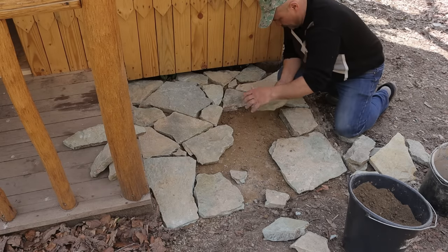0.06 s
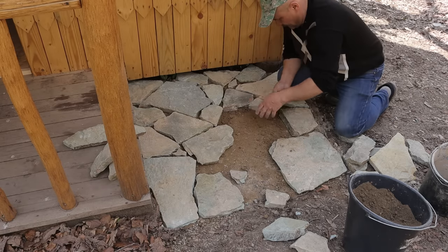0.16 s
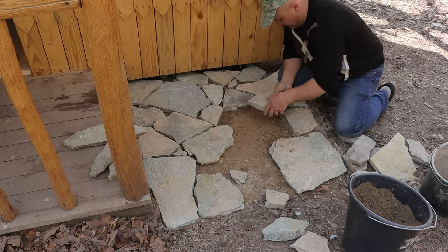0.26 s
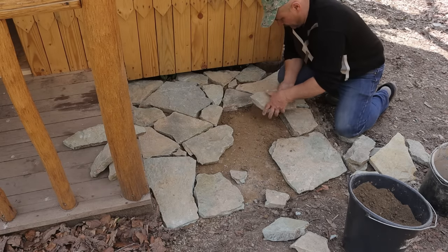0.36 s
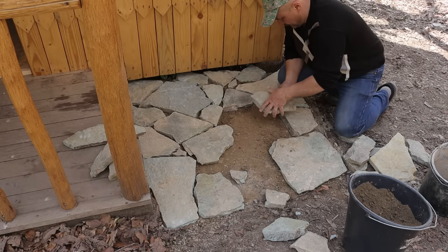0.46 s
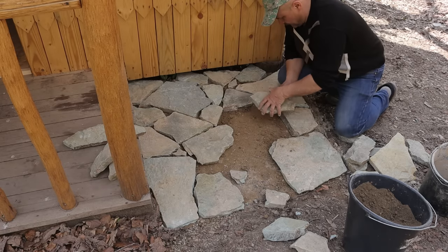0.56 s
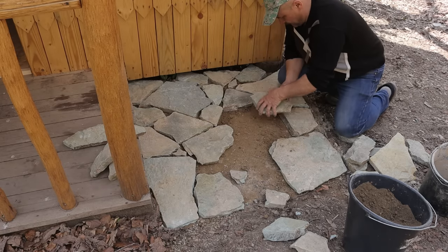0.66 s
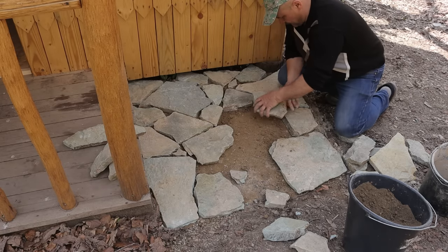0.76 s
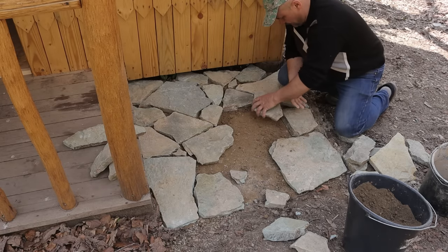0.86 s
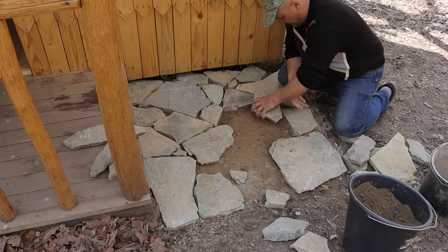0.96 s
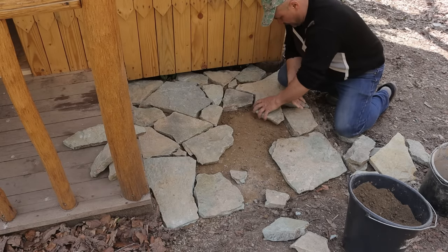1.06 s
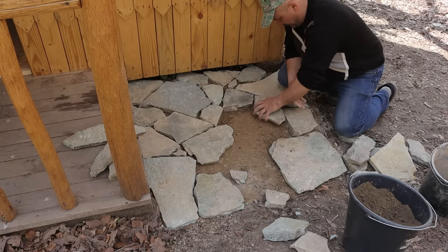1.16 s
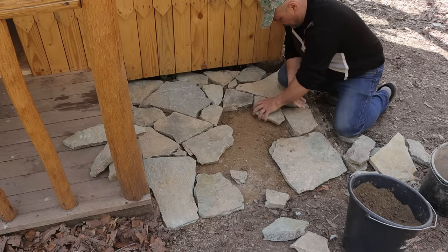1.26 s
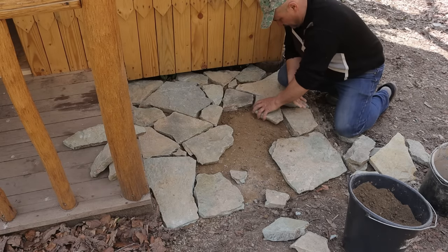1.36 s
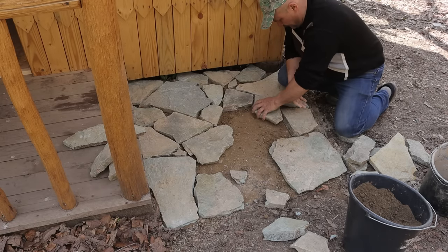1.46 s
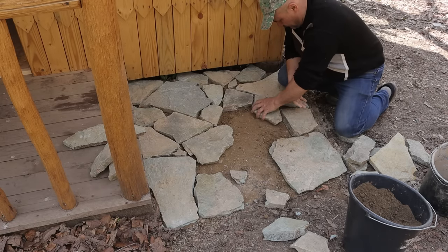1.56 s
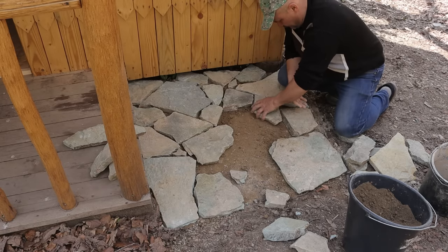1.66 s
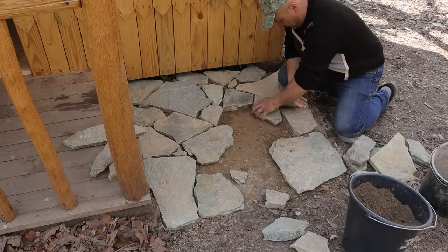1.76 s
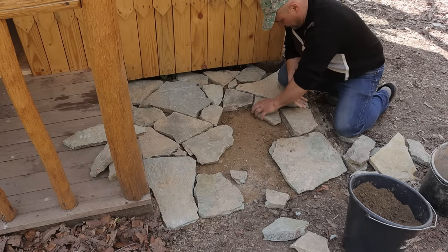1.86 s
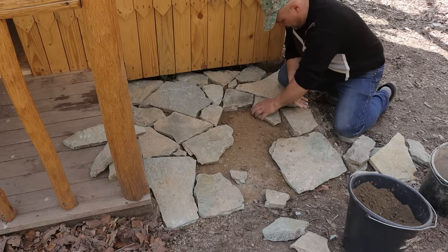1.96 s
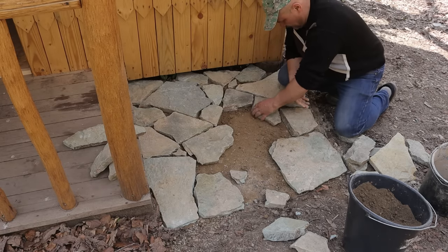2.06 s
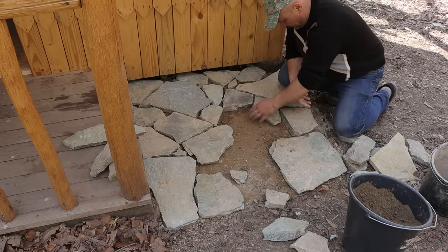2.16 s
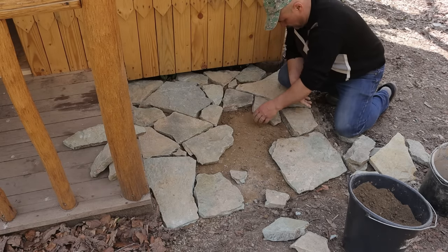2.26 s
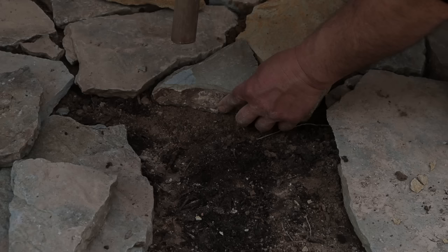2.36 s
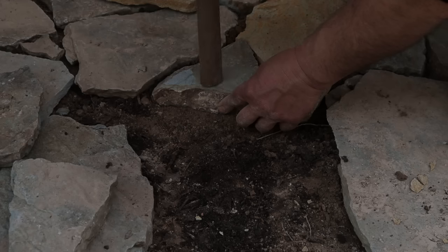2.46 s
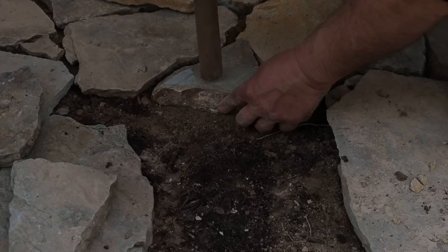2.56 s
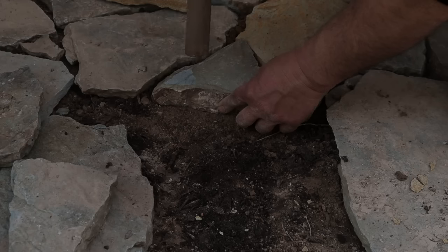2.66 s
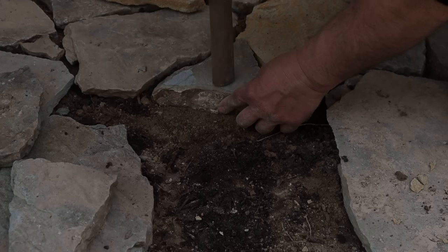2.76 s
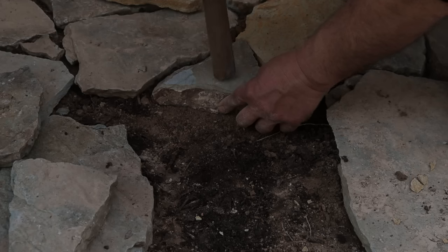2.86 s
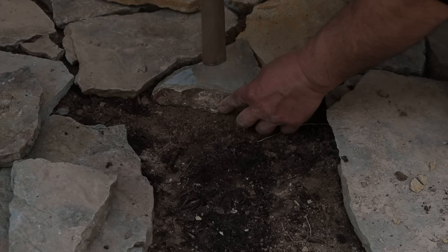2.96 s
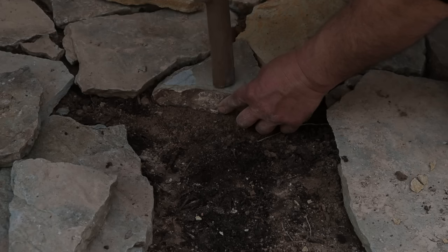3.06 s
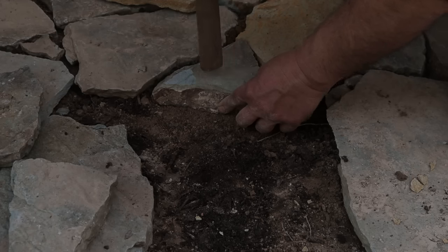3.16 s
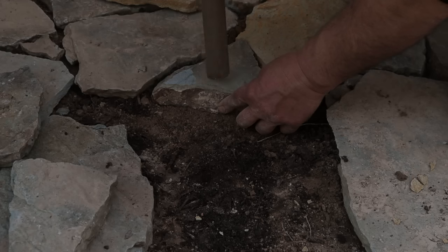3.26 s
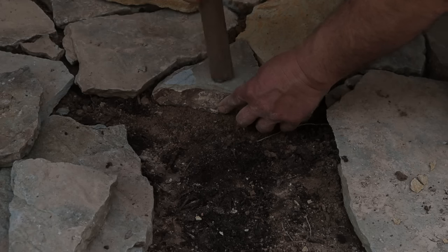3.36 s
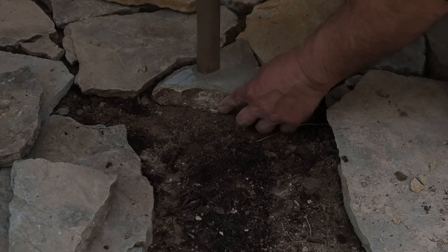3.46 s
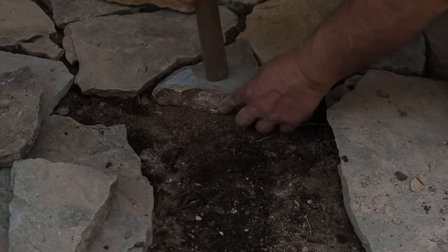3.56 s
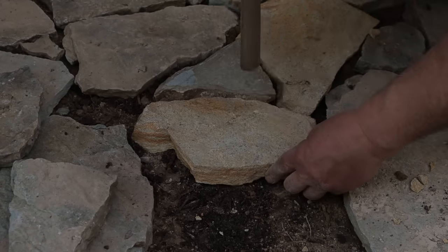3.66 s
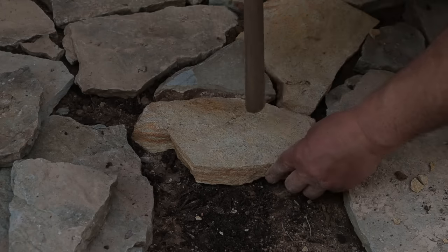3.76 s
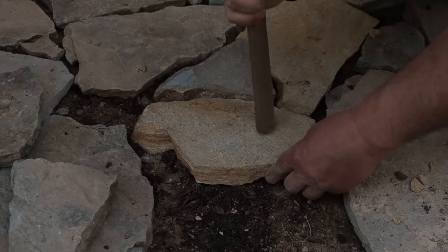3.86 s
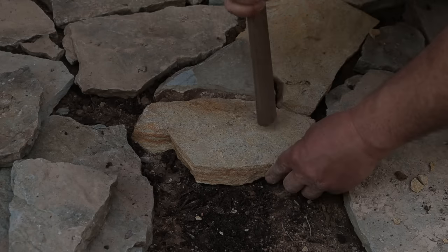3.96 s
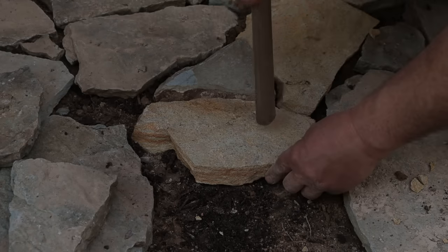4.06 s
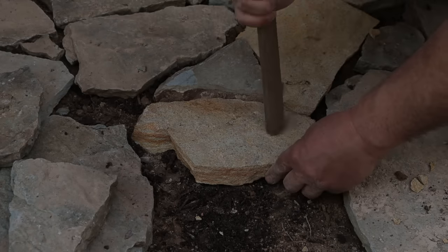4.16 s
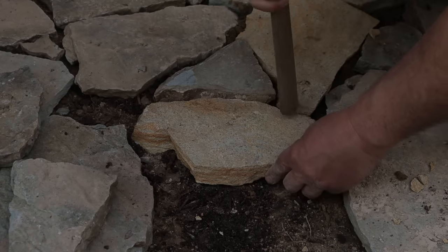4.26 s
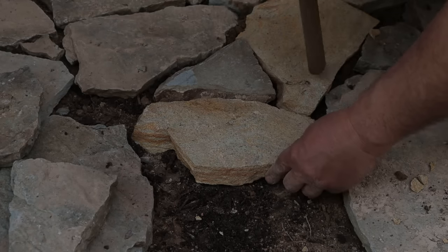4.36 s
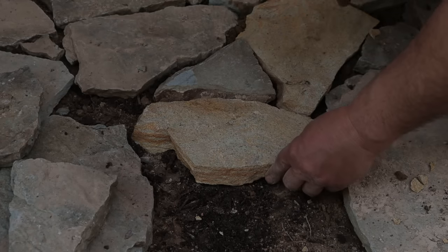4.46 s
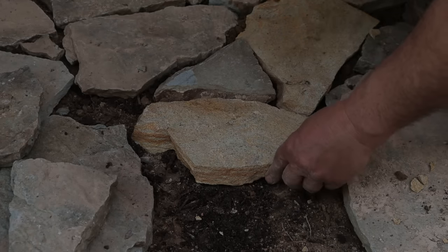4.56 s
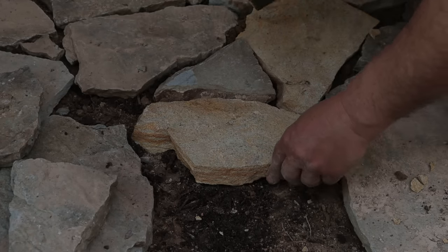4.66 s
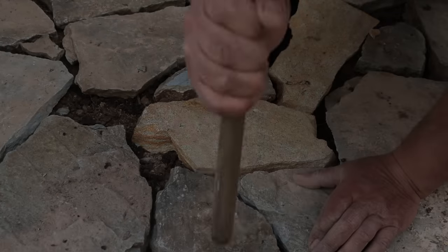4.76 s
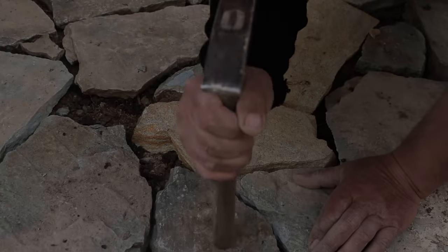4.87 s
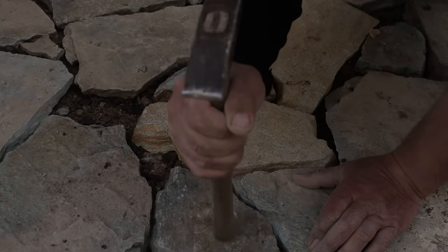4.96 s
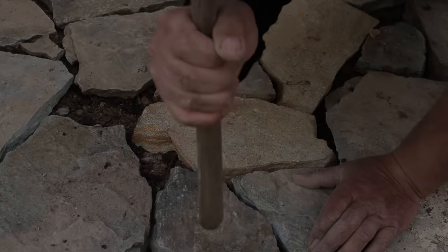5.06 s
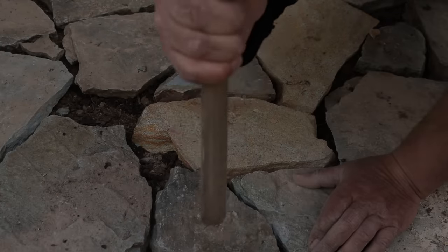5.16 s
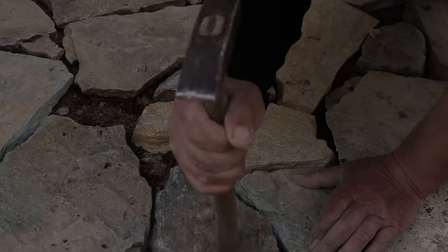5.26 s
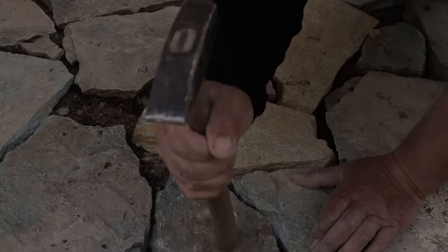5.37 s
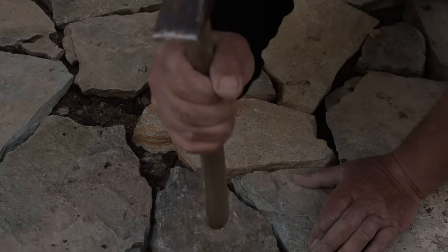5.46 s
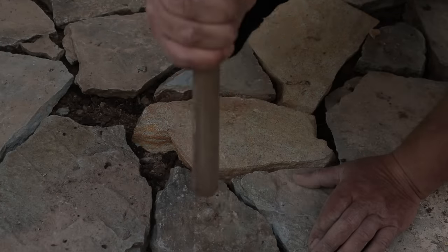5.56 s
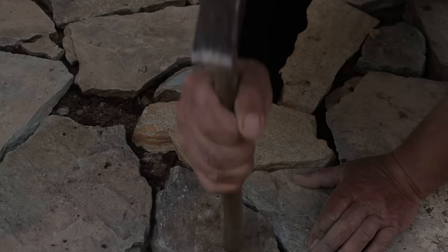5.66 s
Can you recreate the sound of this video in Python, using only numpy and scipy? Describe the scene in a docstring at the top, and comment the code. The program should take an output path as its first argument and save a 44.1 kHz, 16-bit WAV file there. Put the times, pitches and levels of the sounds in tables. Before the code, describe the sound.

Soft sliding and bumping of a loose stone outdoors, followed by loud, close, dead knocks of a hammer handle tamping flagstones.

```python
"""Laying flagstones in a yard

A quiet yard, one microphone. A loose stone is slid over soil, knocked against its neighbours and
dropped in place. Then, close by, the butt of a wooden hammer handle tamps three slabs: dead knocks,
a low boom at the microphone, a ping from the steel head. The knocks overload the microphone and duck
its gain. The yard echoes, small birds call far off, stretches of low rumble and rustle come and go."""
import sys
import numpy as np
from scipy import signal
from scipy.fft import rfft, irfft
from scipy.io import wavfile
from scipy.ndimage import uniform_filter1d, minimum_filter1d

SR = 44100
rng = np.random.default_rng(int(sys.argv[2]) if len(sys.argv) > 2 else 0)


def generate_wav(signal):
    """Clip the signal to [-1, 1] and save it as 16-bit WAV at the path in sys.argv[1]."""
    frames = np.transpose(np.atleast_2d(signal))
    scaled = np.clip(frames, -1, 1) * 32767
    pcm = np.round(scaled).astype(np.int16)
    wavfile.write(sys.argv[1], SR, pcm)


N = 251811
TIME = np.arange(N) / SR
AGE = np.arange(SR * 3 // 4) / SR  # seconds since a contact

# tamping blows: start_s, strength_db, slab_number, brightness_hz, crack_db, ping_db
BLOWS = [(2.5300, 16, 0, 10000, 7, 2.5), (2.8512, 15.5, 0, 5560, 2, 4.5),
         (3.128, 14.5, 0, 3790, -27.5, 4.5), (3.3761, 14, 0, 6500, 9, 6), (3.5916, 14, 0, 8100, -3.5, -8),
         (3.92, 8.5, 1, 3500, 3.5, -1), (4.2020, 9.5, 1, 3000, -0.5, -7), (4.8994, 14, 2, 10000, 12.5, 9.5),
         (5.3372, 14, 2, 8950, 10, -16)]
# modes of each slab under the handle, damped by its bed of soil: pitch_hz, width_hz, level_db
SMALL_SLAB_MODES = [(443, 17, -15.5), (549, 211, 1.5), (877.8, 172, 4.5), (1095, 220, 1.5), (1329.3, 23, 5),
                    (1408, 14, -14), (1752.7, 170, -1.5), (2519, 220, -1), (3110.4, 263, -0.5),
                    (4092, 89, -4.5), (4711, 423, -2.5), (5450, 240, -5), (7370, 800, -11.5)]
FLAT_SLAB_MODES = [(266, 510, -7.5), (700, 60, -1.5), (834, 251, 10.5), (934.31, 140, 10), (980, 12, -1.5),
                   (1146, 96, -11.5), (1446.1, 340, -13.5), (1920, 71, -20.5), (2730, 1100, -11.5),
                   (5014.9, 3000, -24)]
BROAD_SLAB_MODES = [(177.7, 40, -14), (243, 153, -11), (614, 178, -11), (771.8, 110.2, 10),
                    (1186, 160, -10), (1333.2, 174, 4), (1564, 265, -2), (2000, 66, -37.5),
                    (3265, 318, -1.5), (4680, 237, -7), (4830, 210, -32.5), (6120, 230, -20.5)]
# how each slab sounds from where it lies: cutoff_s, scatter_db, yard_db, echo_swell_s,
# echo_mode_width_ratio, lowest_radiated_hz, crack_t60_s, thud_db, late_swell_db
SLAB_PLACES = [(3.703, -14.5, -25, 0.0245, 2.82, 250, 0.0116, 4.5, -50.5),
               (4.72, -17.5, -31.5, 0.0067, 0.64, 250, 0.017, 0, -56),
               (5.71, -18, -26, 0.0137, 2.02, 700, 0.0083, 6.5, -42.5)]
# modes of the low thud and of the steel hammer head: pitch_hz, width_hz, level_db
LOW_THUD_MODES = [(45, 13, -4.5), (78.5, 7.54, 3), (110.4, 130, -7.5), (162, 43, -8.5)]
HEAD_MODES = [(8495, 30, 0)]

# knocks of the loose stone: start_s, strength_db, brightness_hz, grit_db, thud_db
STONE_KNOCKS = [(1.2113, -13.5, 859, -29.5, -44), (1.2470, -41, 2500, -4, -25.5),
                (1.3, -19.5, 1300, -15.5, -15.5), (1.3160, -36, 700, -8.5, 3.5),
                (1.5071, -13.5, 691, -24.5, -34.5), (1.5777, -8.5, 2500, -28.5, -39.5),
                (1.6308, -7, 1110, -28, -35.5), (1.9590, -30, 2500, 0, 12.5)]
# its dull body and its clear ring: pitch_hz, width_hz, level_db
STONE_BODY_MODES = [(198.5, 79, -16), (501, 27.7, 10.5), (664, 354, 10), (998, 58, -25), (1124, 247, 17),
                    (1500, 300, -13.5), (2100, 453, 9), (2500, 176, -4), (3700, 130, -30.5),
                    (5420, 134, -1)]
STONE_RING_MODES = [(2075, 45, -4.5), (2497, 14.76, 22), (2620, 22, -17.5), (3806, 14, 5.5),
                    (4390, 42, -6.5), (5320, 36.6, 6.5)]
# its scrapes along a neighbour and sweeps over soil: peak_s, swell_s (per 20 dB), level_db
STONE_SCRAPES = [(1.5, 0.04, -49.5), (1.922, 0.0285, -33.5)]
SOIL_SWEEPS = [(.015, -16.44, -52), (.48, 0.2538, -53.5), (.585, 0.13, -56), (.79, 0.34, -59),
               (1.95, 0.3763, -59), (2.033, 0.41, -56), (4.64, 0.01, -57.5)]
# spectra of grit rubbed on stone and of brushed soil: frequency_hz, density_db
GRIND_SPECTRUM = [(150, -2), (650, 1), (1100, 0), (1700, -10.5), (2100, 5.5), (2550, -0.5), (3000, -15),
                  (3700, -7.5), (4000, -25), (4350, -9.5), (4900, -25), (5600, -7), (6700, -31.5),
                  (7700, -12), (8600, -19.5), (15000, -27)]
BRUSH_SPECTRUM = [(500, -17), (2400, 4), (5000, -1.5), (8000, 1), (12500, 3), (16000, -14.5)]
# crumbs of grit landing: start_s, peak_db, pitch_hz
CRUMBS = [(3.721, -35, 3000), (3.725, -38, 5500), (4.838, -42.5, 2500), (5.462, -42, 10000)]

# distant bird calls: start_s, length_s, start_hz, final_hz, level_db
BIRD_CHIRPS = [(0.778, 0.109, 2660, 3908, -60), (3.75, 0.13, 2670, 2478, -61),
               (4.031, .015, 3240, 2783, -46.5), (4.294, .015, 3224, 2765, -51),
               (4.626, 0.042, 3400, 3517, -60.5), (4.72, .03, 6895, 5400, -60.5),
               (4.741, .065, 4810, 4393, -59.5), (5.632, 0.0162, 6500, 4740, -55),
               (5.642, 0.048, 4680, 4450, -59)]
# stretches of low rumble and background rustle: start_s, length_s, rumble_db, rustle_db
NOISE_STRETCHES = [(1.206, 0.57, -57, -64), (2.403, 1.5, -59.5, -57.5), (4.708, 1, -44, -57.5)]
# spectra of the outdoor hush, the low rumble and the rustle: frequency_hz, density_db
AIR_SPECTRUM = [(20, -7.5), (60, -10.5), (137, -15.5), (400, -17.5), (600, -19), (850, -20), (1400, -24.5),
                (2000, -25.5), (2500, -26.5), (4000, -29), (11000, -32.5), (16000, -35)]
RUMBLE_SPECTRUM = [(20, 0.5), (45, 4.5), (62, -11), (88, 0), (120, -12), (250, -39.5), (800, -58),
                   (3000, -78)]
RUSTLE_SPECTRUM = [(100, -10), (500, 0.5), (1300, 1), (3500, -10), (7000, -25), (16000, -22)]

# close reflections off stones, the worker's body and the fence: delay_s, level_db
CLOSE_REFLECTIONS = [(.0033, -17), (.0093, -33.5), (0.0125, -18)]
# scatter off paving and fence, and the echo of the whole yard: band_hz, t60_s, level_db
NEAR_SCATTER = [(100, 0.23, 5.5), (500, .07, 2), (1200, 0.098, 0), (5020, 0.096, -7.5),
                (10000, 0.025, -4.5), (15000, .05, 0.5)]
YARD_ECHO = [(80, 0.094, 8), (250, 0.21, 10.5), (700, 0.306, -3), (1010, 0.3416, -1.5), (1450, 0.2845, 0.5),
             (2260, 0.3034, -4), (3400, 0.3264, -6.5), (6500, 0.2142, -5), (14000, 0.047, -1.5)]


def tamping():
    """Close by, the handle hits a slab: a crack of grit, a low boom, a steel ping, a faint late swell."""
    out = np.zeros(N)
    slabs = (SMALL_SLAB_MODES, FLAT_SLAB_MODES, BROAD_SLAB_MODES)
    for number, (slab, place) in enumerate(zip(slabs, SLAB_PLACES)):
        cutoff_s, scatter_db, yard_db, swell_s, widen, lowest_hz, crack_t60_s, thud_db, late_db = place
        direct, radiated, boom = np.zeros((3, N))
        for start_s, strength_db, slab_number, bright_hz, crack_db, ping_db in BLOWS:
            if slab_number != number:
                continue
            knock = 2.418 * ring(slab, detune=.02)  # each grip shifts the modes a little
            crack = amp(crack_db - 14.5) * soften(grit_burst(crack_t60_s), hz=4740)
            contact = soften(knock + crack, bright_hz, order=2)
            ping = amp(ping_db - 44.5) * ring(HEAD_MODES)
            add(direct, start_s, amp(strength_db) * (contact + ping))
            # the sound sent all round rings with the slab's modes widened or narrowed by the place's ratio
            all_round = soften(ring(slab, widen=widen), bright_hz, order=2)
            add(radiated, start_s, amp(strength_db + 7.5) * all_round)
            thud = soften(ring(LOW_THUD_MODES), hz=545)
            add(boom, start_s, amp(strength_db + thud_db - 23.5) * thud)
        radiated = radiate(radiated, lowest_hz)
        late_tail = noise_tail(YARD_ECHO, delay_s=0.1122, swell_s=0.08)  # faint noise after each knock
        late_swell = amp(late_db) * signal.fftconvolve(radiated, late_tail)[:N]
        at_mic = outdoors(direct, radiated, scatter_db, yard_db, swell_s) + late_swell + boom
        for delay_s, level_db in CLOSE_REFLECTIONS:
            add(at_mic, delay_s, amp(level_db) * soften(direct, hz=3000))
        out += at_mic * np.clip((cutoff_s - TIME) / 0.0032, 0, 1)  # the sound breaks off, echo and all
    return out


def loose_stone():
    """A hand-held stone bumps its neighbours, grinds along them and drops on the soil."""
    ring_db, choke_db_per_s, grit_t60_s = -10, 500, 0.0487
    out = np.zeros(N)
    thud = soften(ring(LOW_THUD_MODES, widen=1.83), hz=197)
    rubbing = strokes(STONE_SCRAPES, hold_s=0.0129, fade_db_per_s=651)
    next_touches = [row[0] for row in STONE_KNOCKS[1:]] + [TIME[-1]]
    for (start_s, strength_db, bright_hz, grit_db, thud_db), next_s in zip(STONE_KNOCKS, next_touches):
        body = 2.287 * soften(ring(STONE_BODY_MODES, far_side=True), bright_hz, order=4)
        clear = soften(ring(STONE_RING_MODES, far_side=True), bright_hz, order=2)
        clear *= amp(ring_db - choke_db_per_s * np.maximum(start_s + AGE - next_s, 0))
        add(out, start_s, amp(strength_db) * (body + clear + amp(thud_db) * thud))
        add(rubbing, start_s, amp(strength_db + grit_db - 60 * AGE / grit_t60_s))  # a knock crushes grit
    out += rubbing * noise(GRIND_SPECTRUM, grain_db=3)
    return outdoors(out, out, scatter_db=-14, yard_db=-34.5)


def soil():
    """Soil hisses under the sliding stone; single crumbs tick on the paving."""
    sweeping = strokes(SOIL_SWEEPS, hold_s=0.01, fade_db_per_s=278)
    out = sweeping * noise(BRUSH_SPECTRUM, grain_db=2.5)
    for start_s, peak_db, pitch_hz in CRUMBS:
        tick = signal.fftconvolve(grit_burst(t60_s=0.0118), ring([(pitch_hz, pitch_hz / 5, 0)]))
        add(out, start_s, amp(peak_db) * tick / abs(tick).max())
    return out


def birds():
    """Thin wavering whistles far from the microphone, blurred by distance."""
    out = np.zeros(N)
    for start_s, length_s, start_hz, final_hz, level_db in BIRD_CHIRPS:
        samples = round(length_s * SR)
        waver = unit(uniform_filter1d(rng.standard_normal(samples), size=60))
        pitch_hz = np.geomspace(start_hz, final_hz, samples) * (1 + .02 * waver)
        whistle = np.sin(2 * np.pi * np.cumsum(pitch_hz) / SR)
        add(out, start_s, amp(level_db) * whistle * signal.windows.tukey(samples, 0.5))
    return outdoors(out, out, scatter_db=-5, yard_db=-12)


def background():
    """Over a steady outdoor hush, stretches of low rumble and rustle set in abruptly, hold and fade."""
    rise_s, fade_db_per_s = 0.0165, 33.5
    out = amp(-56) * noise(AIR_SPECTRUM)
    rumble, rustle = noise(RUMBLE_SPECTRUM), noise(RUSTLE_SPECTRUM)
    for start_s, length_s, rumble_db, rustle_db in NOISE_STRETCHES:
        rise = np.clip((TIME - start_s) / rise_s, 0, 1)
        fade = amp(-fade_db_per_s * np.maximum(TIME - start_s - length_s, 0))
        out += rise * fade * (amp(rumble_db) * rumble + amp(rustle_db) * rustle)
    return out


def outdoors(direct, radiated, scatter_db, yard_db, swell_s=.014):
    """Paving and fence scatter the direct sound at once; the yard returns what is radiated all round."""
    near = signal.fftconvolve(direct, noise_tail(NEAR_SCATTER, delay_s=0.001, swell_s=0.0033))
    far = signal.fftconvolve(radiated, noise_tail(YARD_ECHO, delay_s=0.01, swell_s=swell_s))
    return direct + (amp(scatter_db) * near + amp(yard_db) * far)[:N]


def noise_tail(bands, delay_s, swell_s):
    """A tail of sparse noise, energy 1, that sets in after a delay, each band dying at its own speed."""
    taps = rng.choice([-1., 1.], len(AGE)) * (rng.random(len(AGE)) < 0.1)
    hz, age_s, spectra = signal.stft(taps, SR, nperseg=128)
    band_hz, t60_s, level_db = np.transpose(bands)
    colour_db = curve_at(np.c_[band_hz, level_db], hz)[:, None]
    decay_db = 60 * age_s / curve_at(np.c_[band_hz, t60_s], hz)[:, None]
    tail = signal.istft(spectra * amp(colour_db - decay_db), SR)[1][:len(AGE)]
    tail *= np.clip((AGE - delay_s) / swell_s, 0, 1)
    return tail / np.linalg.norm(tail)


def ring(modes, detune=0, widen=1, far_side=False):
    """Struck modes, detuned at random by up to the given fraction; wider modes die sooner."""
    pitch_hz, width_hz, level_db = np.transpose(modes)[:, :, None]
    pitch_hz = pitch_hz * (1 + detune * (2 * rng.random(pitch_hz.shape) - 1))
    weight = amp(level_db) * width_hz / np.sum(amp(level_db) * width_hz)
    if far_side:  # away from the contact, neighbouring modes start in opposition: a softer attack
        weight = weight * np.cos(np.pi * np.arange(len(pitch_hz)))[:, None]
    decay = np.exp(-np.pi * widen * width_hz * AGE)
    return (weight * decay * np.cos(2 * np.pi * pitch_hz * AGE)).sum(0)


def grit_burst(t60_s):
    """Grit crushed in a contact: noise that dies at once."""
    return rng.standard_normal(len(AGE)) * amp(-60 * AGE / t60_s)


def strokes(rows, hold_s, fade_db_per_s):
    """Gain of a rubbing hand: each stroke gathers speed, holds for a moment and stops."""
    gain = np.zeros(N)
    for peak_s, swell_s, level_db in rows:
        swell_db = 20 * np.maximum(peak_s - TIME, 0) / swell_s
        fade_db = fade_db_per_s * np.maximum(TIME - peak_s - hold_s, 0)
        gain += amp(level_db - swell_db - fade_db)
    return gain


def noise(spectrum, grain_db=0):
    """Coloured noise of rms 1; grain_db makes it gritty, in clumps of a millisecond."""
    clumps = amp(grain_db * unit(uniform_filter1d(rng.standard_normal(N), size=44)))
    colour = amp(curve_at(spectrum, np.fft.rfftfreq(N, 1 / SR)))
    return unit(irfft(rfft(clumps * rng.standard_normal(N)) * colour, N))


def radiate(x, hz):
    """A small source sends little of its sound below hz into the distance."""
    return signal.sosfilt(signal.butter(2, hz, "highpass", fs=SR, output="sos"), x)


def soften(x, hz, order=1):
    """Low-pass: takes off the treble above hz, as a softer contact does."""
    return signal.sosfilt(signal.butter(order, hz, fs=SR, output="sos"), x)


def curve_at(points, hz):
    """Interpolates a curve on a log-frequency axis."""
    point_hz, value = np.transpose(points)
    return np.interp(np.log(hz + 1), np.log(point_hz + 1), value)


def add(mix, start_s, sound):
    """Mixes a sound in at start_s."""
    part = mix[round(start_s * SR):][:len(sound)]
    part += sound[:len(part)]


def amp(db):
    """Decibels to gain."""
    return 10 ** (np.asarray(db) / 20)


def unit(x):
    """Scales to rms 1."""
    return x / np.sqrt(np.mean(x ** 2) + 1e-20)


def scene():
    """The yard at one microphone, from the close work to the background."""
    return (tamping() + loose_stone() + soil() + birds() + background())[None]


def gain_control(x, threshold_db, max_duck_db, hold_s, recovery_db_per_s, attack_s):
    """Peaks over the threshold turn the gain down; it holds, then recovers steadily."""
    over_db = np.clip(20 * np.log10(abs(x) + 1e-9) - threshold_db, 0, max_duck_db)
    window = 2 * round(hold_s * SR / 2) + 1
    held_db = -minimum_filter1d(-over_db, window, origin=window // 2)
    recovery_db = recovery_db_per_s * TIME
    duck_db = np.maximum.accumulate(held_db + recovery_db) - recovery_db
    return x * amp(-soften(duck_db, hz=1 / (2 * np.pi * attack_s)))


def record(dry):
    """The gain falls too late for the close knocks, so their first cycles clip; the top treble is cut."""
    ducked = gain_control(dry[0], threshold_db=2.0, max_duck_db=15, hold_s=0.021,
                          recovery_db_per_s=132, attack_s=0.01406)
    clipped = np.clip(ducked, -1, 1)
    band_limit = signal.firwin(255, cutoff=16200, window=("kaiser", 8), fs=SR)
    return signal.fftconvolve(clipped, band_limit, "same")[None]


dry = scene()
out = record(dry)
generate_wav(out)
```